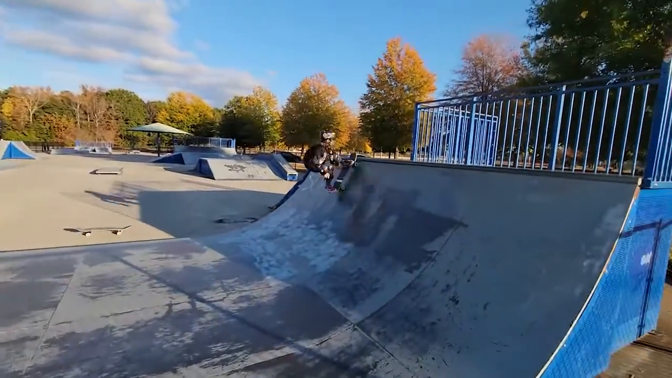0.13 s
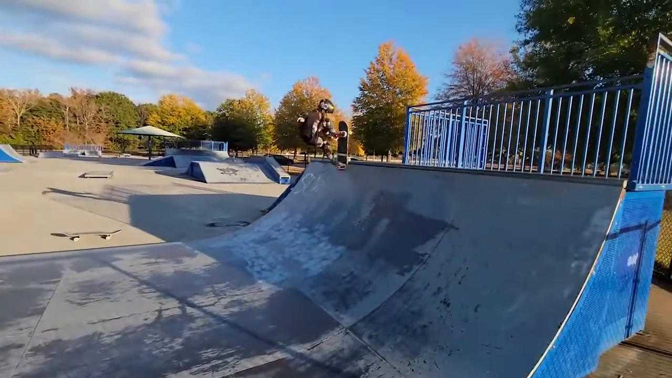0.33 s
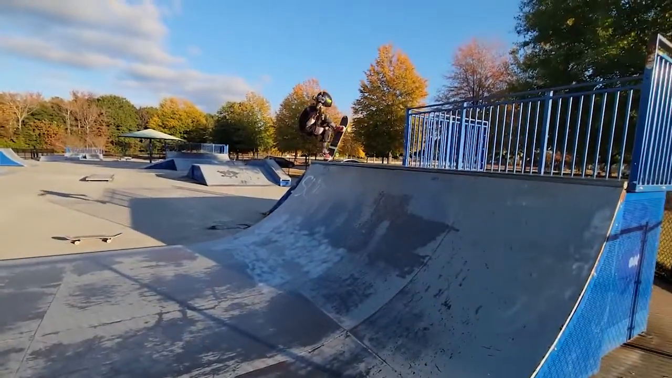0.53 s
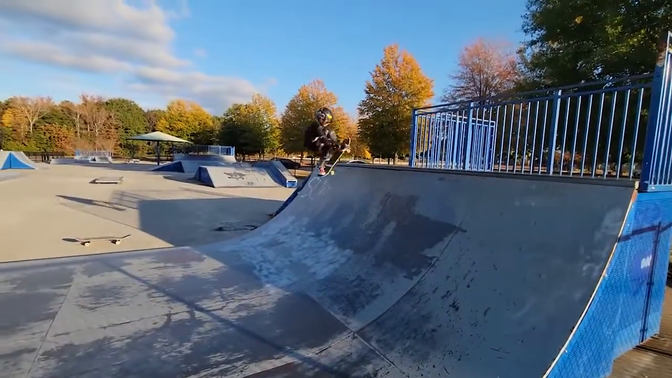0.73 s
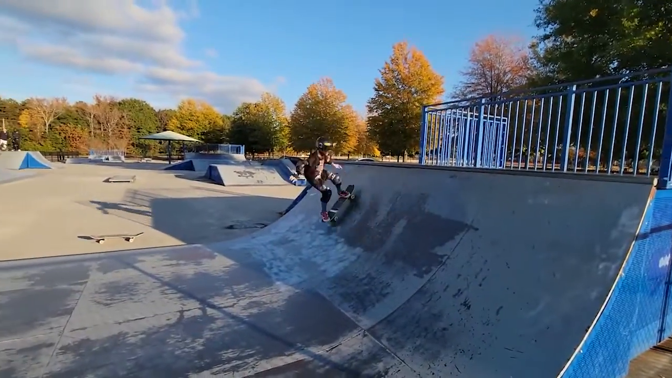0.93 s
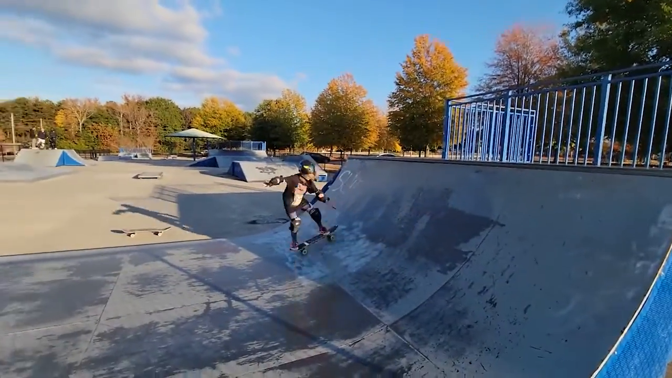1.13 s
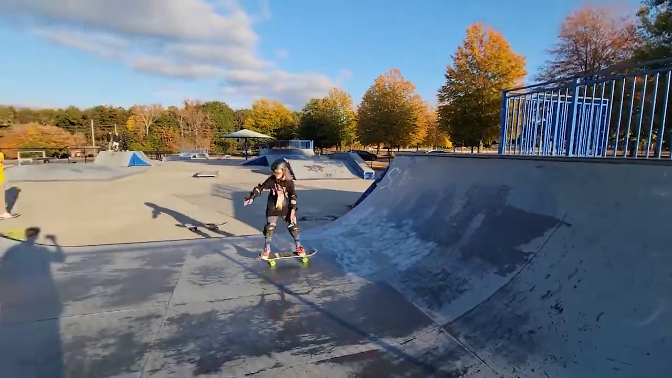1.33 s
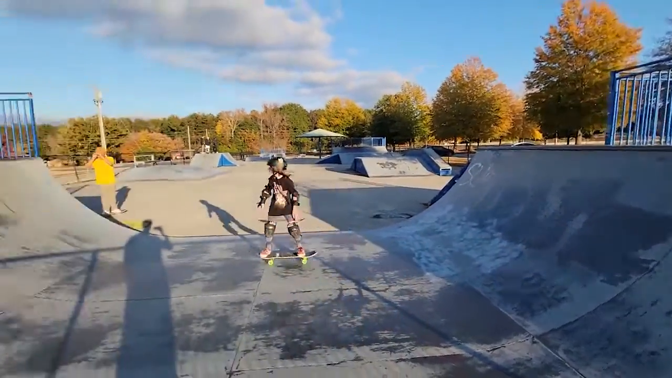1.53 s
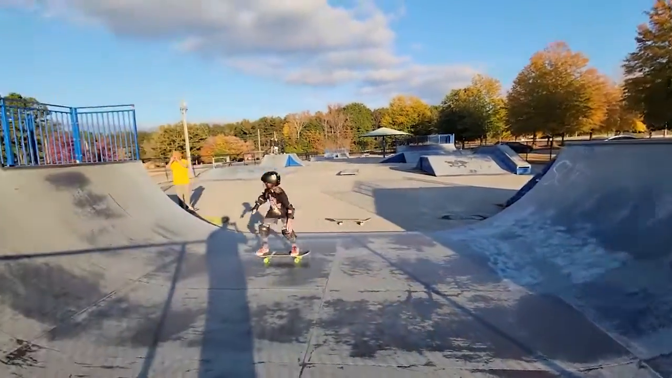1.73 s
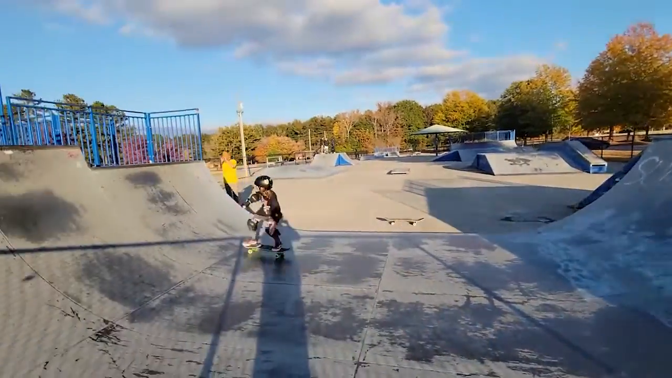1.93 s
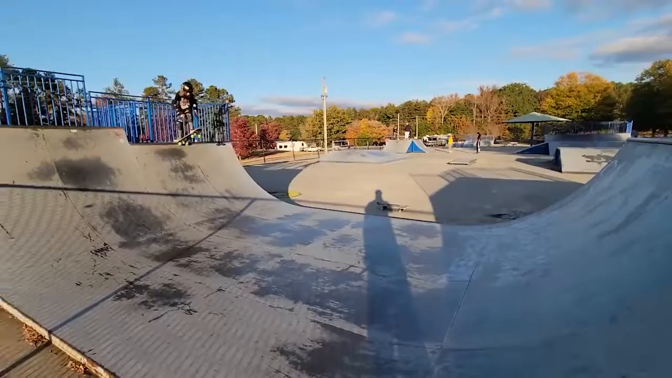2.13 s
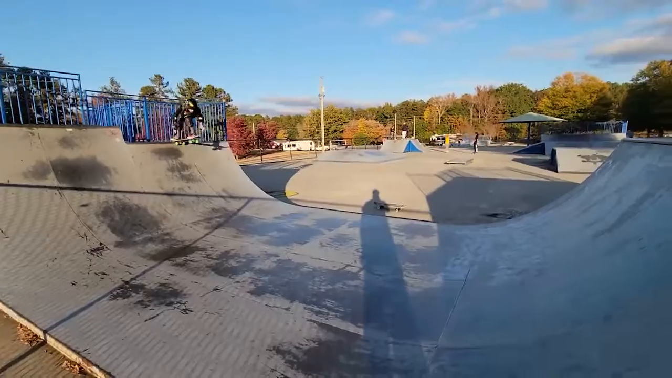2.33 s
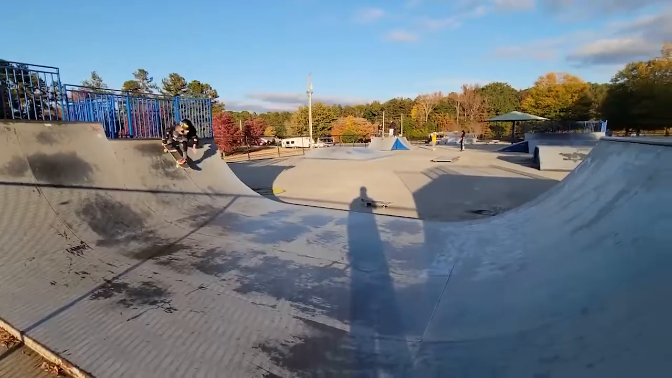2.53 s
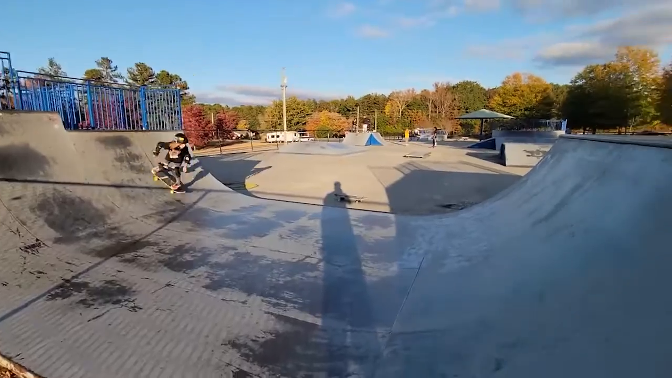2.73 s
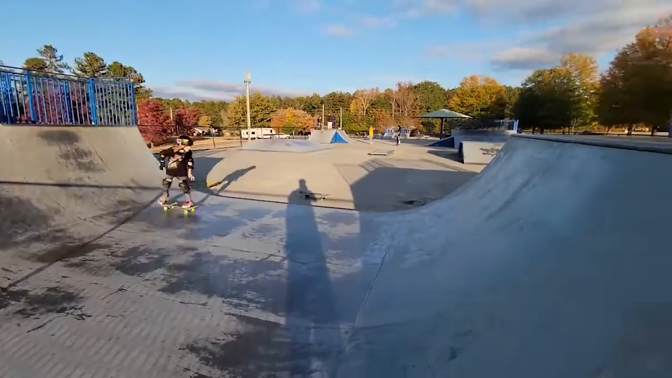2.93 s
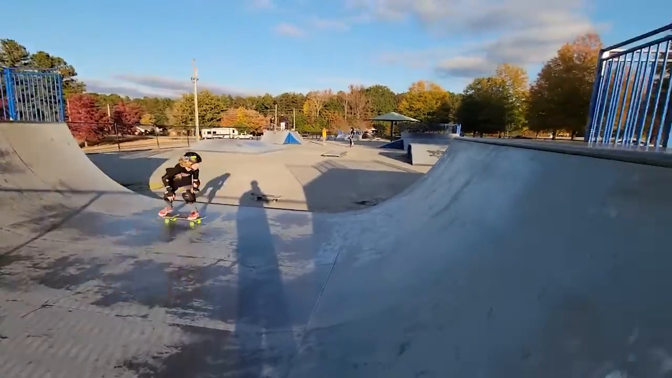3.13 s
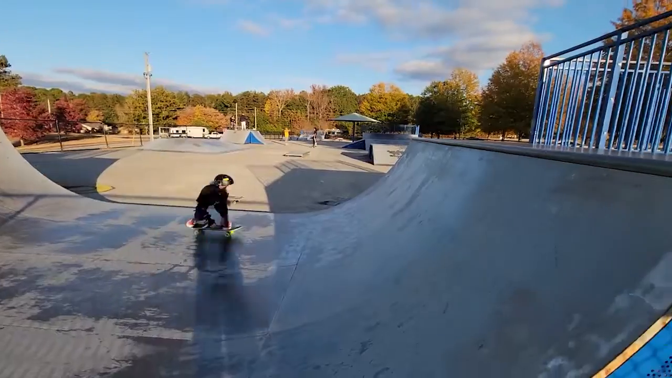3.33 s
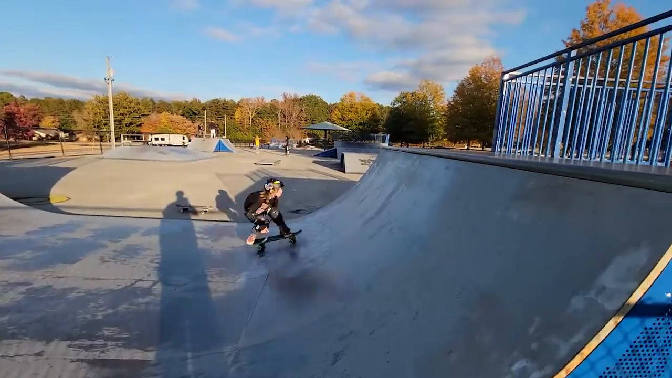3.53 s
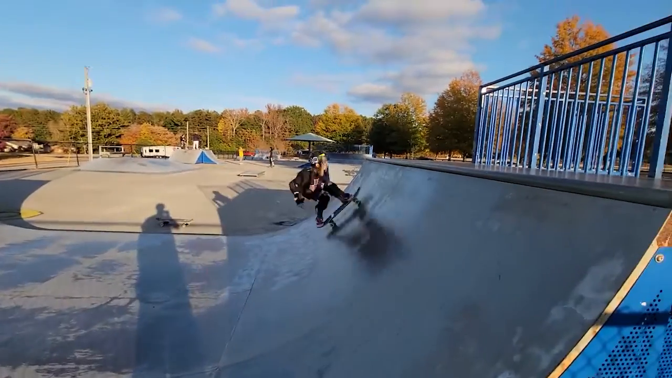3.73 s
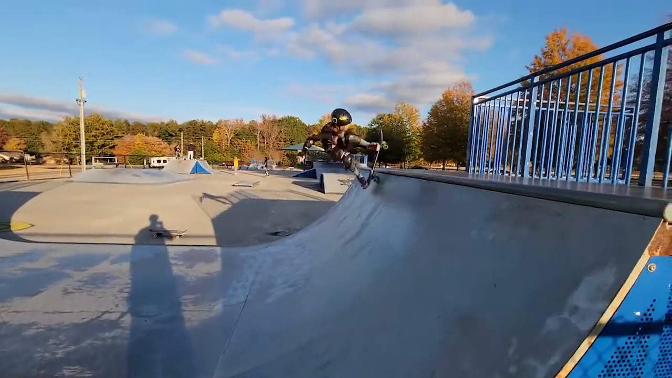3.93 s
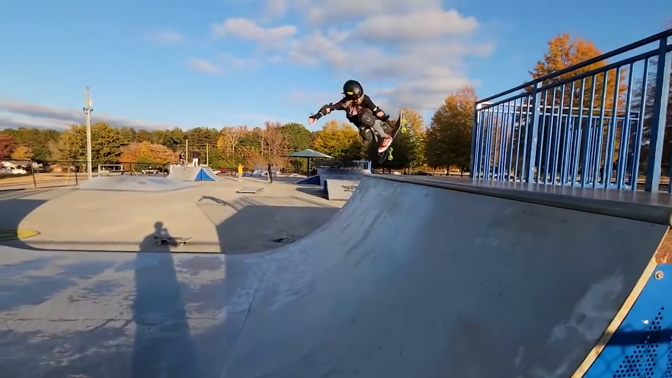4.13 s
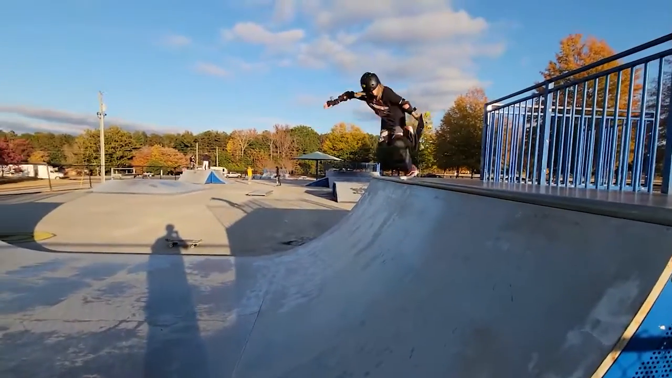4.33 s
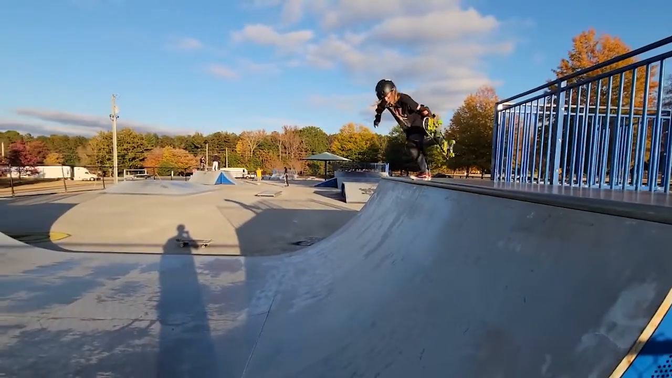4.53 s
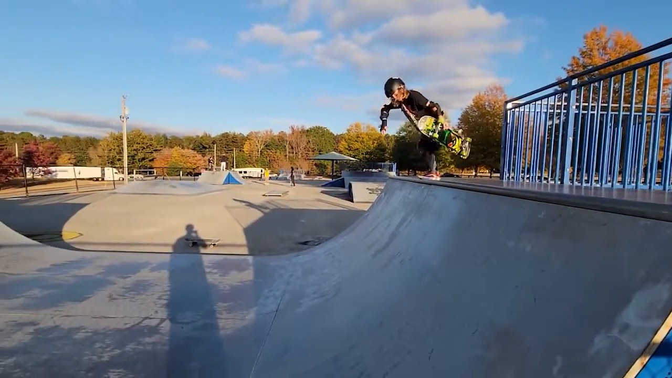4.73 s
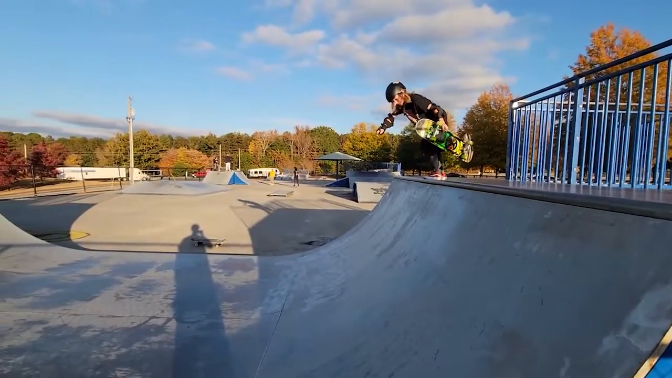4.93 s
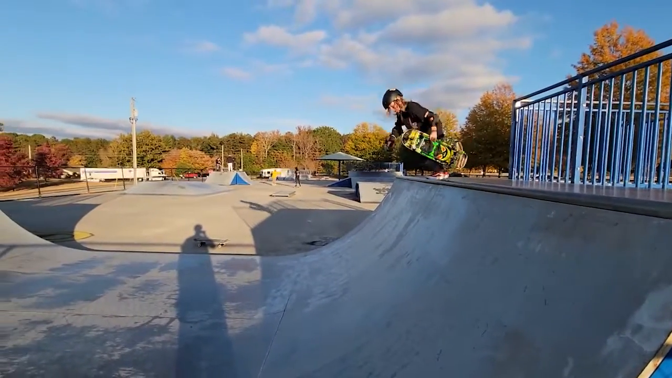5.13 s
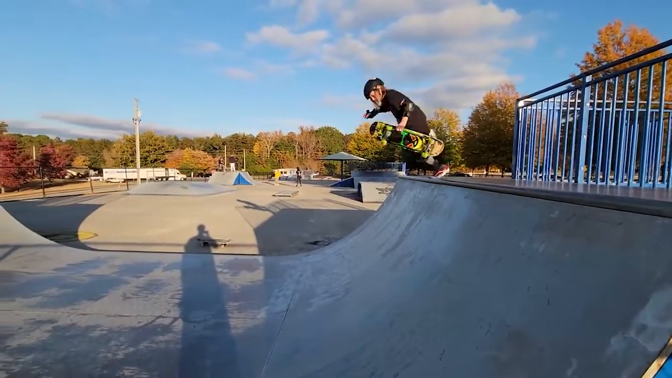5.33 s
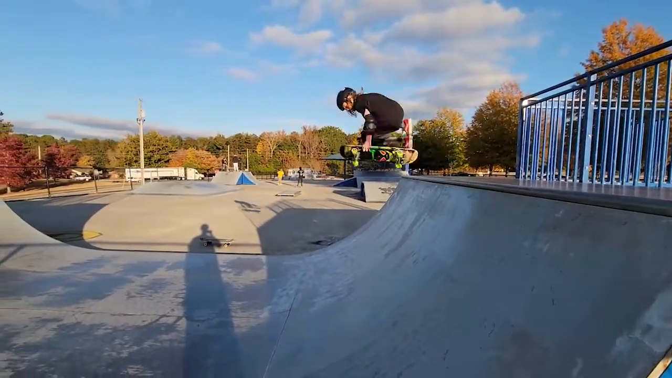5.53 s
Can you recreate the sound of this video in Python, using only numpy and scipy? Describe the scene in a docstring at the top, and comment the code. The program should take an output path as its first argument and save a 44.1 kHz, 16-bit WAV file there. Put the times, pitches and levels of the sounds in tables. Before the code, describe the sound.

Outdoor skateboarding: growling wheels, a sharp wooden clack, two heavy landings that make the ramp boom, short scuffs, then a last clatter and thudding feet.

```python
"""Skateboard on a hollow half-pipe

A skateboarder rides a hollow half-pipe at an outdoor park, heard from the edge of the ramp.
Random contact forces make the wheels rumble and scuff; impacts over the coping and on landing excite
damped modes; the cavity under the ramp booms on by slow, frequency-dependent decay.
Once the foreground breaks off abruptly and picks up with the rider in the air."""
import sys
import numpy as np
from scipy import signal
from scipy.fft import rfft, irfft
from scipy.io import wavfile
from scipy.ndimage import uniform_filter1d

SR = 44100
rng = np.random.default_rng(int(sys.argv[2]) if len(sys.argv) > 2 else 0)


def unload_audio(sound):
    """Save the sound as a 16-bit wav file, at the path given as the first command line argument."""
    columns = np.transpose(np.atleast_2d(sound))
    # keep every value between -1 and 1, then stretch to whole-number steps
    steps = np.round(np.clip(columns, -1, 1) * 32767)
    wavfile.write(sys.argv[1], SR, steps.astype(np.int16))


N = 250488
TIME = np.arange(N) / SR
BREAK_S = 2.118  # foreground sounds begun earlier stop here
BAND_EDGE_HZ = 16200

# All levels are relative to the source they drive.
# Runs from wall to wall, the last by someone far off: [touch_down_s, lift_off_s, flat_roar_db,
#   landing_load_db, climb_load_db, grit_db, sizzle_db, ramp_drive_db, deep_boom_db, wall_note_hz]
RIDES = [(-1, 0.28, -27.5, 15, 3, -42, -50, -28.5, -33.5, 197),
         (1.09, 2.135, -37, 16, 5.5, -53.5, -58.5, -38, -37.5, 189),
         (2.62, 3.97, -23.5, 0.5, 4.5, -39, -60, -25, -36, 258),
         (5, 5.87, -47, -7, 10.5, -52.5, -59.5, -56, -53.5, 260)]
# The rider pumps, pressing the board down: [centre_s, extra_load_db]
PUMPS = [(1.201, 0), (2.94, 3), (3.63, 4)]
# Growl of the wheels, shifting with speed and load: [time_s, pitch_hz, level_re_roar_db]
GROWL_PATH = [(0, 703, -9), (.05, 726, -4), (.144, 640, 1), (.2, 667, -4.5), (1.3, 690, -16),
              (1.87, 710, -4), (2.11, 756, 1), (2.7, 840, 0.5), (2.85, 737, -11.5), (3.32, 682, -0.5),
              (3.6, 774, -2.5), (3.87, 810, -6.5)]
# Blows of the board: [start_s, clack_db, crack_db, coping_db, truck_db, panel_db, boom_db, deep_boom_db]
BLOWS = [(.195, -9, -15.5, -7, -38, -25.5, -17.5, -41.5), (.204, -15.5, -42, -41, -47, -13.5, -12.5, -16.5),
         (0.888, -6.5, -12.5, -19, -26, -25, -19.5, -15), (0.905, -8.5, -10, -18, -23, -38, -13.5, -14.5),
         (.926, -11, -25, -30, -37, -37, -9, -37), (2.617, -8.5, -17, -35, -46, -20, -14.5, -10.5),
         (2.626, -17, -31, -38, -46, -29, -22, -22), (2.637, -12.5, -42, -39, -47, -24, -18, -12.5),
         (2.653, -14, -43, -43, -48, -24, -20, -21), (3.876, -13, -24, -21, -41, -13, -23, -48),
         (3.8807, -18.5, -19, -22, -42, -4, -17, -44)]
# The rider's weight slaps the deck flat: [start_s, level_db]
SLAPS = [(.906, -21), (2.626, -15.5)]
# Short uneven surges in the roar of rolling: [start_s, level_db]
ROAR_SURGES = [(3.186, -19.5), (3.244, -16), (3.27, -14.5), (3.403, -13), (3.455, -13.5), (3.525, -16)]
# The hardware chatters after a hard landing: [start_s, level_db, t60_s]
RATTLES = [(.915, -20, 0.26), (2.625, -28, 0.16)]
# Urethane wheels scuffing sideways: [start_s, length_s, level_db, pitch_hz, width_hz]
SCUFFS = [(.925, .075, -27, 2480, 2000), (2.015, 0.047, -25, 2450, 2200), (2.085, 0.032, -25, 2780, 2200),
          (2.645, 0.061, -35.5, 2600, 2200), (2.845, 0.045, -33, 2800, 1000),
          (2.91, 0.03, -25.5, 3000, 600), (2.915, .036, -26, 2600, 1500), (3.548, 0.057, -25, 2662, 2400),
          (3.61, 0.046, -25.5, 2450, 2000)]
# Wheels click in two quick clusters over joints, then once at the coping: [start_s, level_db]
WHEEL_CLICKS = [(3.55, -20.5), (3.559, -17.5), (3.5638, -19), (3.613, -25), (3.6226, -17), (3.629, -24.5),
                (3.886, -22)]
# A panel drums as the board presses on it: [centre_s, half_length_s, level_db, pitch_hz]
DRUMS = [(.25, 0.031, -15, 200), (3.67, .05, -14, 308.8), (3.955, 0.039, -13.5, 316)]
# The rider's feet come down on the platform: [start_s, level_db, pitch_hz]
STEPS = [(3.995, -12, 106), (4.021, -3.5, 215)]
# Light ticks and rustles: [start_s, level_db, t60_s]
TICKS = [(.342, -26.5, 0.068), (1.595, -32, 0.031), (1.682, -37, .05), (2.913, -30, .053),
         (3.198, -38, 0.078), (3.274, -34, .03), (3.967, -27.5, 0.13), (3.992, -32.5, 0.25),
         (4.943, -43, .09)]

# Spectral shapes of rolling wheels, coarse to fine: [frequency_hz, density_db per Hz]
ROAR_SPECTRUM = [(100, -31), (250, -2.5), (400, 3.5), (560, -.5), (730, 3), (950, -2.5), (1200, -10),
                 (1700, -22), (4000, -36), (16000, -80)]
GRIT_SPECTRUM = [(400, -17), (1200, 8.5), (1900, 6.5), (2900, 5), (4000, -8.5), (6000, -14), (8000, -25.5),
                 (10000, -28.5), (13500, -18), (16000, -29)]
SIZZLE_SPECTRUM = [(1500, -21), (3500, 6), (6500, -2), (9500, -20), (13000, -6), (16000, -5)]
# Spectral shapes of the ramp's boom and its lowest part: [frequency_hz, density_db per Hz]
BOOM_SPECTRUM = [(40, -45), (100, -5.5), (150, -3.5), (195, 1.5), (235, -2), (325, 1.7), (400, -6),
                 (550, -15.5), (1000, -19), (3000, -75)]
DEEP_SPECTRUM = [(20, -40), (42, -18.5), (62, -3), (88, 5.5), (125, -0.5), (190, -10.5), (400, -45.5),
                 (1500, -72)]
# Spectral shapes of wooden clack, hard crack and light tick: [frequency_hz, density_db per Hz]
CLACK_SPECTRUM = [(25, -21), (80, 2.5), (300, -8), (480, -2), (750, 4.5), (1050, 1.5), (1400, -6),
                  (2000, -10), (3000, -10.5), (4500, -21.5), (9000, -62), (16000, -53)]
CRACK_SPECTRUM = [(300, -21), (1500, -19), (3200, -1), (4500, -4.5), (6400, -2.5), (8000, -14.5),
                  (10500, -20.5), (12500, -11), (16000, -22)]
TICK_SPECTRUM = [(200, -4), (1500, 14.5), (4000, 4.5), (6500, 4.5), (9000, -9), (11000, -4), (13000, -0.5),
                 (16000, -5)]
# Spectral shapes of the open air and its thin hiss: [frequency_hz, density_db per Hz]
AIR_SPECTRUM = [(20, -3.5), (70, 17.5), (200, 4.5), (350, -1), (520, -14), (800, 2.5), (1200, -1.5),
                (1900, -7), (3000, -12), (5000, -24), (7000, -33.5), (10000, -51), (16000, -62.5)]
HISS_SPECTRUM = [(1500, -16), (4000, 5), (6000, -3.5), (8000, -7.5), (10500, -20), (13500, -9),
                 (16000, -20)]

# Modes of the coping, trucks, ramp panel, wheel and wooden deck: [frequency_hz, level_db, t60_s]
COPING_MODES = [(690, -9, .2), (829, -8, .14), (967, 2, .095), (1160, -13, .13), (1520, -21, .14),
                (1585, -22, .18), (1865, -22, .2), (2260, -19, .12), (2730, -18, .11), (2930, -17.5, .11),
                (3250, -20, .1), (3550, -18.5, .09)]
TRUCK_MODES = [(738, 2, 0.17), (816.4, 5.5, 0.23), (1400, -15, .15), (1702, -3.5, 0.16), (1780, -2.5, 0.09),
               (2470, -3, .14), (2600, -4.5, 0.15), (2780, -1.5, 0.12), (3115, 0.5, .12), (3490, -2, 0.12),
               (4164, -9.5, 0.18), (5300, -11.5, .17)]
PANEL_MODES = [(281, -9, 0.4), (316.6, 4.5, 0.1), (556, -3.5, 0.044), (660, -4.5, 0.045),
               (839, -6.5, 0.091), (1255, -10.5, 0.045), (1443, -12.5, .07), (5050, -21, .08)]
WHEEL_MODES = [(1040, 3.5, 0.031), (2360, -5, .022), (2780, 2, 0.023), (3047, 0, 0.029),
               (3970, -14.5, 0.017)]
DECK_MODES = [(383, -2, 0.22), (472.7, -1.5, 0.24), (948, -2.5, 0.13), (2056, -15, 0.2), (2340, -9, 0.18)]

# Decay of the cavity under the ramp, and of the park around it: [frequency_hz, t60_s]
CAVITY_DECAY = [(60, 3.7), (200, 2.39), (330, 2.33), (500, 2.4), (1000, 1.6), (4000, 0.7)]
PARK_DECAY = [(200, 0.35), (800, 1.34), (1600, 1.26), (2500, 1.16), (5500, 1.83), (14000, 0.6)]
# The stereo pair, left and right: [frequency_hz, correlation (-1 to 1), left_minus_right_db]
STEREO_PAIR = [(60, 0.99, -2), (140, 0.96, 0.5), (275, 1, -3), (640, 0.16, 1), (1430, -0.58, -4),
               (3030, -0.01, -6), (5740, -0.03, -4), (9100, -0.35, 5.5), (13950, 0.17, -0.5)]

TOUCH_S = 0.014  # the wheels take hold
SETTLE_S, CLIMB_S = 0.23, 0.39  # the landing load eases off; the load builds up the next wall
PUMP_S = 0.061
RUN_OUT_T60, SHAKE_T60 = 0.66, 1.97  # s: after lift-off wheels fall silent quickly, panels slowly
SHAKE_SHARE = 0.91  # how much of the extra load, in dB, goes into the ramp
# The grit is loudest as the board passes the listening point
APPROACH_S, APPROACH_WIDTH_S, APPROACH_DB = 3.44, 0.2, 5
# A wall's note swells as the rider nears its lip, and lingers after lift-off
WALL_DB, WALL_SWELL_S, WALL_LINGER_S = 4, 0.44, 0.92
AIR_DB, FAR_ROAR_DB, FAR_BOOM_DB, HISS_DB = -37, -49, -38, -60  # the rest of the park
HUSH_S, HUSH_DB = 0.22, -13  # far boom and hiss dip briefly after the break


def amp(db):
    """Decibel law: level to amplitude ratio."""
    return 10 ** (np.asarray(db) / 20)


def unit(x):
    """Normalisation to unit mean power (rms 1)."""
    return x / np.sqrt(np.mean(x ** 2) + 1e-20)


def at_hz(table, hz, axis=1):
    """Interpolation of a table column on a logarithmic frequency axis."""
    columns = np.transpose(table)
    return np.interp(np.log(hz + 1), np.log(columns[0] + 1), columns[axis])


def unbroken(s):
    """Time gate: 1 on the same side of the break as the moment s, else 0."""
    return (TIME < BREAK_S) == (s < BREAK_S)


def add(mix, s, sound):
    """Superposition: adds a sound at s; one that starts before the break stops there."""
    start = round(s * SR)
    stop = round(BREAK_S * SR) if s < BREAK_S else N
    part = mix[:, start:stop][:, :sound.shape[1]]
    part += sound[:, :part.shape[1]]


def colour(white, spectrum):
    """Spectral shaping of two unrelated signals, with interchannel correlation and balance."""
    a, b = rfft(white)
    hz = np.fft.rfftfreq(white.shape[1], 1 / SR)
    correlation = np.clip(at_hz(STEREO_PAIR, hz), -1, 1)
    lean = amp(at_hz(STEREO_PAIR, hz, axis=2) / 2)
    left = a * lean
    right = (correlation * a + np.sqrt(1 - correlation ** 2) * b) / lean
    shaped = np.array([left, right]) * amp(at_hz(spectrum, hz))
    return unit(irfft(shaped, white.shape[1]))


def noise(spectrum, size=N):
    """Filtered Gaussian noise in stereo."""
    return colour(rng.standard_normal((2, size)), spectrum)


def fade(t, t60):
    """Exponential decay: a fall of 60 dB in t60 seconds."""
    return np.exp(-np.log(1000) * t / np.maximum(t60, 1e-3))


def onset(t, rise_s):
    """Exponential approach: a sound rises with time constant rise_s."""
    return 1 - np.exp(-t / rise_s)


def dying(x, decays):
    """Frequency-dependent damping: every band of x dies at its own speed."""
    hz, t, bands = signal.stft(x, SR, nperseg=512)
    bands = bands * fade(t, at_hz(decays, hz)[:, None])
    return signal.istft(bands, SR, nperseg=512)[1]


def ring_on(x, response):
    """Linear convolution with a response of unit energy, on each side of the break."""
    out, cut = np.zeros((2, N)), round(BREAK_S * SR)
    response = response / np.sqrt(np.sum(response ** 2, axis=1).mean())
    add(out, 0, signal.fftconvolve(x[:, :cut], response, axes=1))
    add(out, BREAK_S, signal.fftconvolve(x[:, cut:], response, axes=1))
    return out


def bumps(per_s, spread_db, size=N):
    """Random impulse trains: tiny impacts of uneven strength, as wheels meet the surface grain."""
    strength_db = spread_db * np.minimum(rng.exponential(1, (2, size)), 4)
    strength = amp(strength_db) * rng.choice([-1, 1], (2, size))
    return unit(strength * (rng.random((2, size)) < per_s / SR))


def wobble(per_s, depth_db):
    """Slow amplitude modulation: a random gain drawn per_s times a second and interpolated."""
    knots = rng.standard_normal(1000)
    return amp(depth_db * np.interp(TIME * per_s, np.arange(len(knots)), knots))


def modes(table, t, spread):
    """Modal sum of damped sines; random channel phase lag grows with frequency (spread: rad per kHz)."""
    out = np.zeros((2, len(t)))
    for hz, db, t60 in table:
        lag = np.array([[0], [spread * hz / 1000 * rng.standard_normal()]])
        out += amp(db) * fade(t, t60) * np.sin(2 * np.pi * (hz * t + rng.random()) + lag)
    return out


def resonate(x, hz, width):
    """Heterodyne resonance of gain 1 at hz, which may be a curve."""
    turn = np.exp(2j * np.pi * np.cumsum(hz * np.ones(N)) / SR)
    r = np.exp(-np.pi * width / SR)
    # shift the resonance to 0 Hz, smooth, and shift back
    return 2 * (turn * signal.lfilter([1 - r], [1, -r], x / turn)).real


def wheels():
    """Rolling noise: random contact forces give roar, growl, grit and sizzle that follow the load."""
    roar = colour(bumps(per_s=900, spread_db=2.5), ROAR_SPECTRUM) + growl()
    passing = amp(APPROACH_DB * np.exp(-((TIME - APPROACH_S) / APPROACH_WIDTH_S) ** 2))
    grit = passing * colour(bumps(per_s=1400, spread_db=2.0), GRIT_SPECTRUM)
    sizzle = colour(bumps(per_s=5000, spread_db=4.5), SIZZLE_SPECTRUM)
    out = np.zeros((2, N))
    for start, end, roar_db, landing_db, climb_db, grit_db, sizzle_db, *_ in RIDES:
        contact, load_db = rolling(start, end, landing_db, climb_db, RUN_OUT_T60)
        texture = amp(roar_db) * roar + amp(grit_db) * grit + amp(sizzle_db) * sizzle
        out += contact * amp(load_db) * texture
    # uneven patches make the whole swell
    return wobble(per_s=35, depth_db=1.5) * out


def growl(width_hz=130):
    """Forced resonance: surface bumps keep one gliding resonance of the loaded wheels ringing."""
    s, hz, db = np.transpose(GROWL_PATH)
    pitch = np.interp(TIME, s, hz)
    drive = colour(bumps(per_s=400, spread_db=2.5), ROAR_SPECTRUM)
    once = resonate(drive, pitch, width_hz)
    return amp(np.interp(TIME, s, db)) * unit(resonate(once, pitch, width_hz))


def rolling(start, end, landing_db, climb_db, release_t60):
    """Contact mechanics of one run: wheel contact (0-1), and load (dB) shifted by landing, climb, pumps."""
    since, until = np.maximum(TIME - start, 0), np.maximum(end - TIME, 0)
    contact = np.minimum(since / TOUCH_S, 1) * fade(np.maximum(TIME - end, 0), release_t60)
    load_db = landing_db * np.exp(-since / SETTLE_S) + climb_db * np.exp(-until / CLIMB_S)
    for s, db in PUMPS:
        load_db = load_db + db * np.exp(-((TIME - s) / PUMP_S) ** 2)
    return contact * unbroken(start), load_db


def roar_surges(t60=.06, rise_s=0.0012):
    """Amplitude fluctuation: short decaying noise bursts make uneven surges in the roar of rolling."""
    out, t = np.zeros((2, N)), TIME[:SR // 8]
    for s, db in ROAR_SURGES:
        add(out, s, amp(db) * noise(ROAR_SPECTRUM, size=len(t)) * fade(t, t60) * onset(t, rise_s))
    return out


def board(clack_t60=0.097, crack_t60=0.037, rise_s=0.0009, touch_db=-13, touch_s=.005):
    """Impact excitation: each blow clacks, cracks, and rings the modes of coping, trucks and panel."""
    out, t = np.zeros((2, N)), TIME[:SR // 2]
    for s, clack_db, crack_db, coping_db, truck_db, panel_db, *_ in BLOWS:
        sound = amp(clack_db) * noise(CLACK_SPECTRUM, size=len(t)) * fade(t, clack_t60)
        sound += amp(crack_db) * noise(CRACK_SPECTRUM, size=len(t)) * fade(t, crack_t60)
        # one wheel grazes the surface just before the full weight arrives
        add(out, s - touch_s, amp(touch_db) * sound * np.minimum(t / touch_s, 1))
        for table, db in (COPING_MODES, coping_db), (TRUCK_MODES, truck_db), (PANEL_MODES, panel_db):
            sound += amp(db) * modes(table, t, spread=1.09)
        add(out, s, sound * onset(t, rise_s))
    return out


def deck(rise_s=0.0011):
    """Flexural vibration: the wooden deck bends and rings as the rider's weight slaps it flat."""
    out, t = np.zeros((2, N)), TIME[:SR // 2]
    for s, db in SLAPS:
        add(out, s, amp(db) * modes(DECK_MODES, t, spread=0.93) * onset(t, rise_s))
    return out


def rattles(knocks_per_s=130, knock_db=2.0, damping=3):
    """Repeated impact: loose trucks knock against the deck, their modes damped, in a dying chatter."""
    out, t = np.zeros((2, N)), TIME[:SR // 3]
    damped = [(hz, level, ring_t60 / damping) for hz, level, ring_t60 in TRUCK_MODES]
    for s, db, t60 in RATTLES:
        ring = modes(damped, t, spread=1.06)
        knocks = bumps(knocks_per_s, knock_db, size=len(t))
        chatter = signal.fftconvolve(knocks, ring, axes=1)[:, :len(t)]
        add(out, s, amp(db) * unit(chatter) * fade(t, t60))
    return out


def scuffs(slips_per_s=500, slip_db=2.0, rub_db=-4, skirt_db=-28):
    """Stick-slip friction: quick uneven snaps excite one broad squeaky resonance."""
    out, t = np.zeros((2, N)), TIME[:SR // 4]
    hz = np.geomspace(200, 16000, 80)
    for s, length, db, pitch, width in SCUFFS:
        peak = 1 / (1 + ((hz - pitch) / width * 2) ** 2)
        skirt = amp(skirt_db) / (1 + (hz / 4000) ** 4)
        slips = bumps(slips_per_s, slip_db, size=len(t))
        slips = slips + amp(rub_db) * rng.standard_normal((2, len(t)))
        rasp = colour(slips, np.c_[hz, 20 * np.log10(peak + skirt)])
        envelope = np.minimum(t / 0.0017, 1) * np.exp(-(t / length) ** 3)
        add(out, s, amp(db) * rasp * envelope)
    return out


def wheel_clicks(rise_s=.0004):
    """Impulse response of a wheel: damped modes click in two clusters over joints, then at the coping."""
    out, t = np.zeros((2, N)), TIME[:SR // 10]
    for s, db in WHEEL_CLICKS:
        add(out, s, amp(db) * modes(WHEEL_MODES, t, spread=0.61) * onset(t, rise_s))
    return out


def ramp(near_share=0.98, ring_share=0.71, thud_db=4, thud_t60=0.39, ring_db=-3, rise_s=0.035):
    """Cavity reverberation: rolling and blows shake the ramp; panels thud and the hollow rings on."""
    shake = shaking()
    cavity = dying(rng.standard_normal((1, 2 * SR)), CAVITY_DECAY)
    out = near_share * shake + ring_share * ring_on(shake, cavity)
    t = TIME[:2 * SR]
    for s, *_, boom_db, deep_db in BLOWS:
        body = amp(boom_db) * noise(BOOM_SPECTRUM, size=len(t))
        body = body + amp(deep_db) * noise(DEEP_SPECTRUM, size=len(t))
        thud = amp(thud_db) * fade(t, thud_t60) * body
        ring = amp(ring_db) * dying(body, CAVITY_DECAY)[:, :len(t)]
        add(out, s, (thud + ring) * onset(t, rise_s) / 2)
    return out


def shaking():
    """Forced vibration: the rolling load drives the ramp's panels and their deeper boom."""
    boom, deep, out = noise(BOOM_SPECTRUM), noise(DEEP_SPECTRUM), np.zeros((2, N))
    for start, end, _, landing_db, climb_db, _, _, drive_db, deep_db, _ in RIDES:
        contact, load_db = rolling(start, end, landing_db, climb_db, SHAKE_T60)
        panels = amp(drive_db) * boom + amp(deep_db) * deep
        out += contact * amp(SHAKE_SHARE * load_db) * panels
    return out


def wall(boom, width_hz=55, level_db=-2.0):
    """Selective resonance: each wall favours its own note, most when the rider is near its lip."""
    out = boom.copy()
    for start, end, *_, hz in RIDES:
        spread_s = np.where(TIME < end, WALL_SWELL_S, WALL_LINGER_S)
        near = 1 / (1 + ((TIME - end) / spread_s) ** 2)
        out += amp(WALL_DB) * near * unbroken(start) * resonate(boom, hz, width_hz)
    return amp(level_db) * out


def drumming():
    """Membrane-like vibration: the pressed panel swells on one unsteady note and dies away."""
    out = np.zeros(N)
    for s, length, db, hz in DRUMS:
        turns = np.cumsum(hz * wobble(per_s=90, depth_db=.5)) / SR
        swell = np.exp(-((TIME - s) / length) ** 2)
        out += amp(db) * swell * np.sin(2 * np.pi * turns)
    return out


def thumps(level_db=1, thump_hz=70, t60=0.17, rise_s=0.012):
    """Damped oscillation: weight pushes the ramp's skin in, a short low thump under each blow."""
    out, t = np.zeros((2, N)), TIME[:SR // 2]
    for s, *_, deep_db in BLOWS:
        hz = thump_hz * (1 + 0.062 * rng.standard_normal())  # each blow differs a little
        push = np.sin(2 * np.pi * hz * t) * fade(t, t60) * onset(t, rise_s)
        add(out, s, amp(level_db + deep_db) * np.array([push, push]))
    return out


def steps(t60=0.11, rise_s=0.0052):
    """Single-mode impact: dull thuds of shoes on the hollow platform."""
    out, t = np.zeros((2, N)), TIME[:SR // 3]
    for s, db, hz in STEPS:
        add(out, s, modes([(hz, db, t60)], t, spread=1) * onset(t, rise_s))
    return out


def ticks(swell_share=0.022):
    """Decaying noise bursts: small bright clicks and rustles; longer ones also start more softly."""
    out, t = np.zeros((2, N)), TIME[:SR // 4]
    for s, db, t60 in TICKS:
        swell = np.minimum(t / (swell_share * t60), 1)
        add(out, s, amp(db) * noise(TICK_SPECTRUM, size=len(t)) * fade(t, t60) * swell)
    return out


def park(x, walls_db=-5, walls_t60=0.28, tail_db=-11, delay_s=0.0055):
    """Early and late reflection: curved walls return the sound; railings and far ramps add a thin tail."""
    t = TIME[:SR]
    gap = np.clip(t / delay_s - 1, 0, 1)  # silent until delay_s, full at twice that
    walls = rng.standard_normal((2, SR)) * (rng.random((2, SR)) < 1500 / SR)  # sparse echoes
    walls = walls * fade(t, walls_t60) * gap
    tail = dying(rng.standard_normal((2, SR)), PARK_DECAY)[:, :SR] * gap
    return amp(walls_db) * ring_on(x, walls) + amp(tail_db) * ring_on(x, tail)


def outdoors():
    """Ambient noise field: distant hum, far wheels and ramps, and a thin hiss."""
    after_break = 1. * ((TIME > BREAK_S) & (TIME < BREAK_S + HUSH_S))
    hush = amp(HUSH_DB * uniform_filter1d(after_break, size=1500))
    far = amp(FAR_BOOM_DB) * noise(BOOM_SPECTRUM) + amp(HISS_DB) * noise(HISS_SPECTRUM)
    return amp(AIR_DB) * noise(AIR_SPECTRUM) + amp(FAR_ROAR_DB) * noise(ROAR_SPECTRUM) + hush * far


def pulsing_line(line_hz=10080, level_db=-80, pulses_per_s=60):
    """Amplitude-modulated narrowband noise: a very faint pulsing line near 10 kHz."""
    pulse = 1 + np.cos(2 * np.pi * pulses_per_s * TIME)
    return amp(level_db) * pulse * unit(resonate(rng.standard_normal(N), line_hz, 25))


def scene(wheels_db=-1.5, scuff_send_db=-6):
    """Superposition of board and wheels in the park, the booming ramp and the open air."""
    direct = amp(wheels_db) * wheels() + board() + deck() + roar_surges() + rattles()
    squeaks = scuffs() + wheel_clicks()
    echo = park(direct + amp(scuff_send_db) * squeaks)
    ramp_sound = wall(ramp()) + drumming() + thumps()
    background = outdoors() + pulsing_line()
    return direct + squeaks + echo + ramp_sound + steps() + ticks() + background


def record(dry):
    """Soft saturation and band limiting: the loudest peaks are rounded, then the top is cut."""
    knee = .7
    over = np.maximum(abs(dry) - knee, 0)
    rounded = dry + np.sign(dry) * ((1 - knee) * np.tanh(over / (1 - knee)) - over)
    lowpass = signal.firwin(511, BAND_EDGE_HZ, window=("kaiser", 9), fs=SR)
    return signal.oaconvolve(rounded, lowpass[None], "same")


dry = scene()
out = record(dry)
unload_audio(out)
```